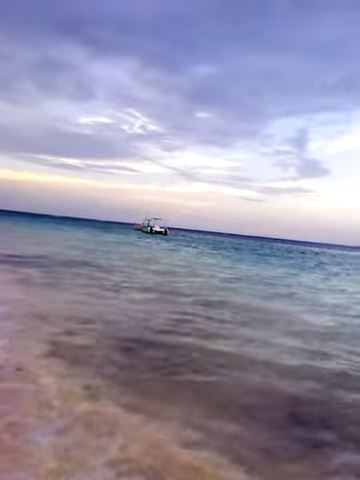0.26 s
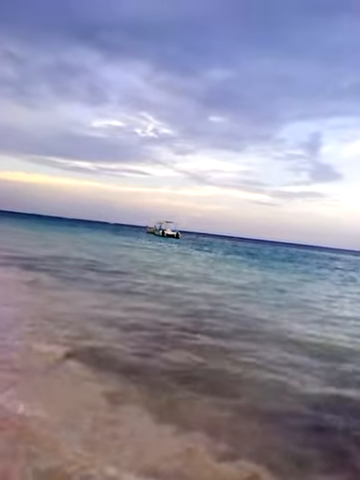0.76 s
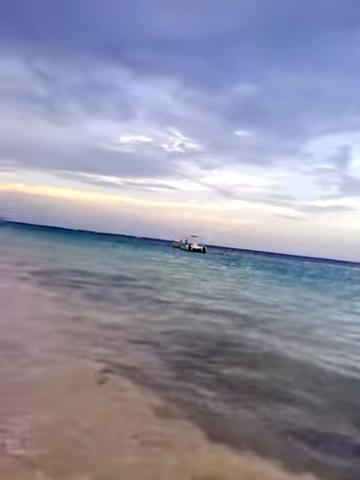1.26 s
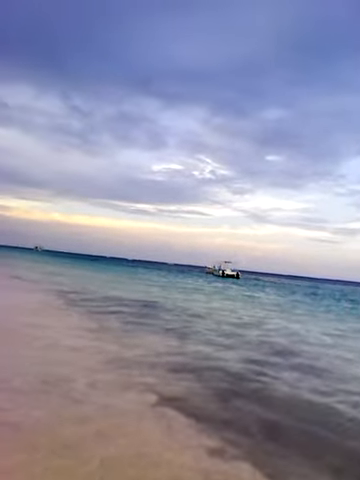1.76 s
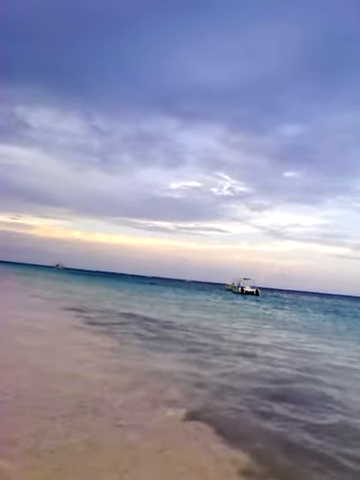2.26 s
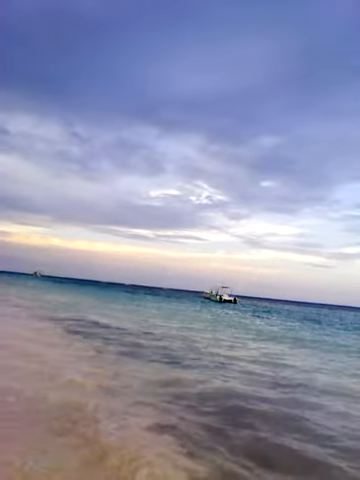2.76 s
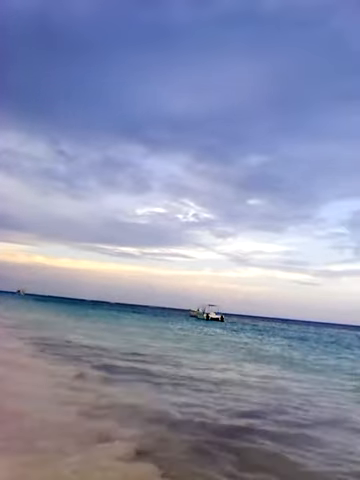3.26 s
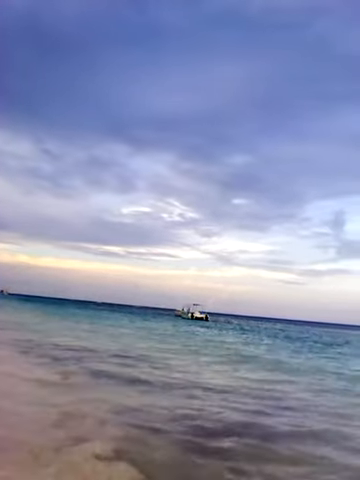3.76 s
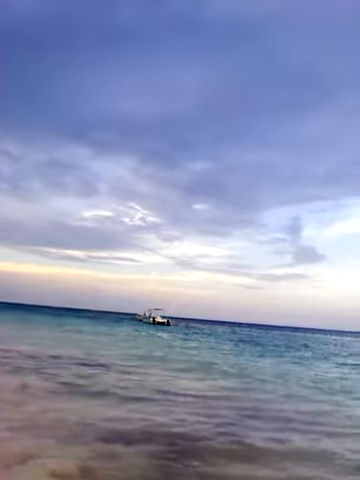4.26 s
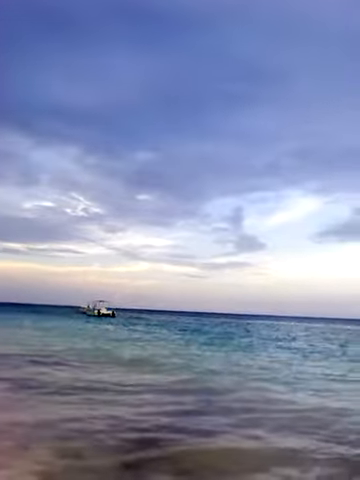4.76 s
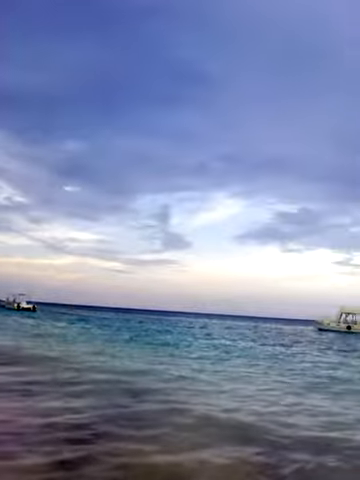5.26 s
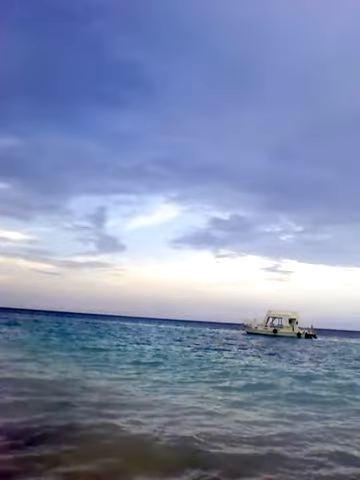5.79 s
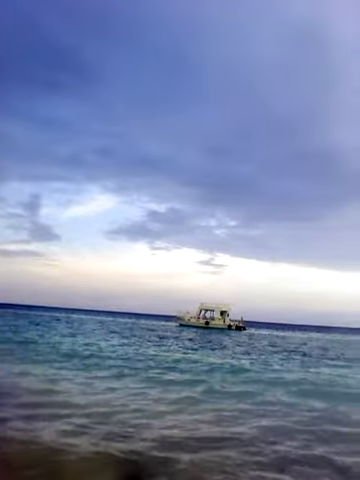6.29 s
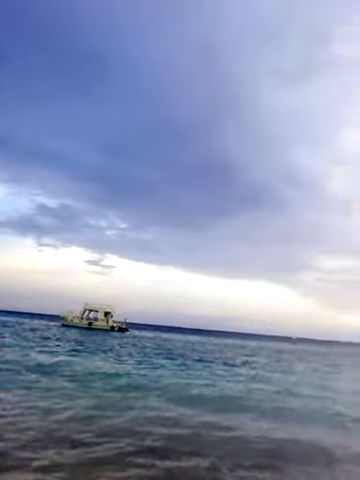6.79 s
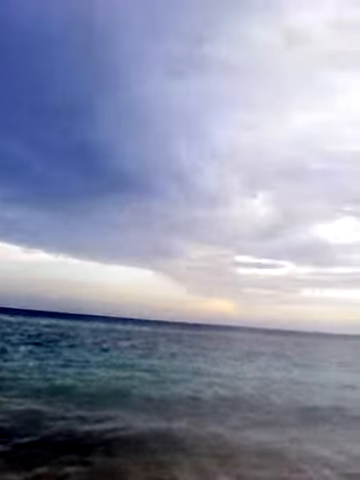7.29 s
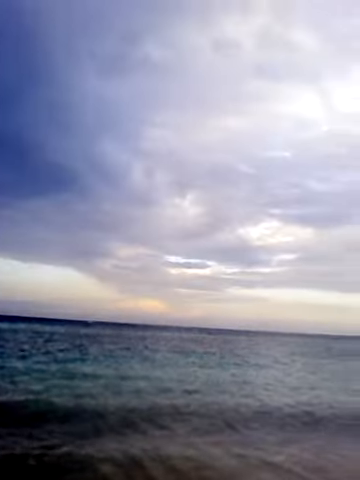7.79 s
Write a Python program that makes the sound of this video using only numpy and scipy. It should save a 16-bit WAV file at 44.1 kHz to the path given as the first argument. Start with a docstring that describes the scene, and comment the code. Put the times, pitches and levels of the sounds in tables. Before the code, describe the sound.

Outdoors on a sandy beach, heard through a small mono microphone that sharpens the water's hiss. From 0 s a steady light wash of tumbling bubbles and spray runs under wind; low bumps culminate in a hard burst at about 0.5 s, then scattered softer thuds until 2 s. The surf grows, fizzing, with small splashes after 2 s, and a small wave breaks near 2.9 s, its bubbling rush rising in pitch, then fading quickly while the wind is almost still. From 3.5 s buffeting returns, swelling at 4.4-5.4 s into heavy low rumble with sharp overloaded thumps near 5.2 s, while the water drops to a lull. A faint wavering low hum lingers from 5.4 to 7 s. At about 6 s the next wash hisses in, with little plops near 6.7 s, continuing to 8 s with occasional wind thuds.

```python
"""Small waves and wind on a beach

Surf: ringing bubbles tumble, spray and fizz; one wave breaks near 3 s, then a lull and the next wash.
Splashes: short swells of band-passed noise.
Wind: noise bands gusting on a small mono microphone, with a pressure pulse at each strong eddy.
Hum: an unsteady low note of air crossing an edge.
Microphone: its port rings near 6 kHz and sharpens the surf's hiss; the hardest puffs overload it."""
import sys
import numpy as np
from scipy import signal
from scipy.io import wavfile
from scipy.ndimage import uniform_filter1d

SR = 44100
rng = np.random.default_rng(int(sys.argv[2]) if len(sys.argv) > 2 else 0)


def pcm_store(signal):
    """Save signal as 16-bit PCM."""
    levels = np.round(np.clip(np.atleast_2d(signal), -1, 1) * 32767)
    wavfile.write(sys.argv[1], SR, levels.astype(np.int16).T)


N = 354563
TIME = np.arange(N) / SR   # s

# Levels are those ahead of the microphone's port; spectra are relative.
# hum of air across an edge: t/s, f/Hz, level/dB
HUM_CURVE = [(5.42, 130, -34.5), (5.62, 125.8, -32.5), (5.77, 124, -24.5), (5.93, 124, -24),
             (6.02, 129.2, -30), (6.3, 131.2, -29.5), (6.55, 130.7, -27), (6.7, 113.4, -28),
             (6.95, 107, -33)]
# steady breeze: t/s, level/dB
BREEZE_CURVE = [(0, -30), (.35, -42.5), (.85, -43), (1.2, -35.5), (1.75, -31.5), (2.15, -46), (3.25, -59),
                (3.55, -36.5), (4.35, -28), (5.55, -33), (6.95, -33.5), (7.25, -31.5), (8.04, -33)]
# gusts on top of the breeze: start/s, length/s, level/dB
GUST_EVENTS = [(0.468, 0.13, -25), (4.466, 0.67, -21.5), (5.147, 0.13, -20)]
# strongest eddies at the microphone: t/s, peak level/dB, length/s, core thump f/Hz
PUFF_EVENTS = [(.124, -22, 0.022, 303), (0.296, -22.5, 0.02, 300), (.434, -18, 0.0081, 148),
               (.536, -10, 0.025, 198), (.552, -9, 0.0079, 320), (0.564, -6.5, 0.0097, 516),
               (.653, -18.5, 0.024, 162), (.702, -14, 0.016, 390), (0.817, -24, .012, 198),
               (0.915, -19.5, 0.024, 380), (.972, -13.5, 0.023, 520), (1.048, -20.5, 0.01, 200),
               (1.21, -20.5, 0.039, 306), (1.4245, -19, 0.011, 298), (1.643, -19, .016, 280),
               (1.807, -21.5, 0.0083, 248), (1.95, -25, 0.015, 300), (3.355, -20, 0.0067, 227),
               (3.517, -25, 0.014, 248), (3.637, -23, 0.0066, 200), (3.713, -17.5, 0.023, 460),
               (4.025, -21, 0.024, 306), (4.175, -21, 0.018, 218), (4.377, -17.5, .015, 220),
               (4.485, -17, .04, 200), (4.544, -15, 0.0069, 302), (4.653, -12, .0073, 330),
               (4.772, -12, 0.022, 260), (4.8244, -13.5, 0.011, 550), (4.935, -15.5, .014, 170),
               (5.022, -15, .007, 180), (5.164, -11.5, 0.032, 402), (5.196, -4.5, 0.0061, 300),
               (5.1975, -8.5, .0008, 920), (5.2374, -7.5, 0.00075, 710), (5.2517, -7.5, 0.0059, 282),
               (5.292, -11, .016, 300), (5.384, -15, 0.0045, 314), (5.669, -22.5, 0.012, 320),
               (5.93, -23.5, 0.022, 172), (6.111, -25, 0.022, 283), (7.224, -16.5, 0.012, 322),
               (7.345, -19.5, 0.011, 277), (7.386, -22, 0.0099, 300), (7.64, -20.5, 0.054, 300),
               (8.01, -19, 0.033, 280)]
# wind pressure spectrum at the port: f/Hz, level/dB per Hz
BUFFET_SPECTRUM = [(20, -18), (45, -13.5), (80, -2.5), (135, 0), (190, 1), (260, -3), (380, -9.5),
                   (550, -21), (850, -40.5), (1400, -68), (2200, -80)]
# single splashes close by: t/s, level/dB, f/Hz, length/s
SPLASH_EVENTS = [(1.587, -43, 11000, .03), (2.182, -32, 6100, 0.24), (2.38, -30, 6200, 0.13),
                 (2.917, -25, 1510, .04), (3.365, -36, 10900, 0.023), (3.764, -31, 860, 0.035),
                 (6.034, -39, 5240, 0.025), (6.331, -38, 9000, 0.017), (6.651, -21, 1039, 0.0071),
                 (6.685, -28.5, 1040, 0.015), (6.744, -34, 796, 0.076)]
# surf spectra, tumbling water, spray and foam: f/Hz, level/dB per Hz
TUMBLE_SPECTRUM = [(50, -9), (130, -0.5), (320, 1.5), (480, 0.5), (750, -0.5), (1400, -3.5), (2200, -8.5),
                   (3500, -11.5), (7000, -17.5)]
SPRAY_SPECTRUM = [(1500, -8.5), (2800, -3), (4200, -1), (6000, 0.5), (8000, -7), (11000, -18), (15500, -23)]
FOAM_SPECTRUM = [(3000, 4.5), (5000, -3.5), (8000, 7.5), (11000, 0.5), (15500, 1)]
# strength of the wash: t/s, level/dB above the usual
WASH_CURVE = [(0, 0), (.8, 0.7), (1.1, 2.5), (1.8, 7), (2.1, 5), (2.88, 13), (3.2, 4.5), (3.7, -.7),
              (4.2, -2.5), (4.8, -13.5), (5.9, -15), (6.04, -5.5), (6.42, 2), (7.7, 4), (8.04, 6)]
# foam bursting on the sand: t/s, level/dB
FOAM_CURVE = [(0, -43.5), (1.2, -44), (1.6, -39.5), (2.8, -35.5), (3.3, -46), (6.0, -51), (6.8, -41),
              (8.04, -42.5)]

GUST_RISE_S, GUST_FALL_S = 0.04, 0.14   # time constants
# stray eddies: rate, mean level over the wind, uniform scatter (+/-), mean length
EDDIES_PER_S, EDDY_OVER_WIND_DB, EDDY_SCATTER_DB, EDDY_S = 6, 5.5, 1.5, 0.014
TUMBLE_DB, SPRAY_DB = -33.5, -38.5   # at the usual wash
TUMBLE_FOLLOWS = 0.79   # share of the wash's dB swing
BREAK_START_S, BREAK_PEAK_S, BREAK_DB = 2.19, 2.89, -26
BREAK_FADE_IN_S = 0.23   # ends at BREAK_START_S
BREAK_SWELL_DB_PER_S, BREAK_DECAY_DB_PER_S = 11.5, 17
CLOUD_START_HZ, CLOUD_END_HZ, CLOUD_RISE_S = 740, 1620, 0.68
PORT_HZ, PORT_Q, PORT_ADDED_DB = 6174, 5.54, 7   # resonance added to the direct sound
OVERLOAD, CUTOFF_HZ = 0.7, 15700   # OVERLOAD: amplitude limit


def from_db(db):
    """Decibels to gain."""
    return 10 ** (np.asarray(db) / 20)


def rms_one(x):
    """Scale to rms 1."""
    return x / np.sqrt(np.mean(x ** 2) + 1e-20)


def in_time(rows):
    """Interpolate each column of a curve to every sample."""
    times_s, *columns = np.transpose(rows)
    return [np.interp(TIME, times_s, column) for column in columns]


def at_hz(spectrum, hz):
    """Read a spectrum's dB on a log-frequency axis."""
    freqs_hz, levels_db = np.transpose(spectrum)
    return np.interp(np.log(hz), np.log(freqs_hz), levels_db)


def drift(rate_hz):
    """Slow random signal, rms 1: noise through two equal one-pole low-passes, run at SR / 40."""
    pole = np.exp(-2 * np.pi * rate_hz * 40 / SR)
    noise = rng.standard_normal(N // 40 + 2002)
    slow = signal.lfilter([1], [1, -2 * pole, pole * pole], noise)[2000:]   # skip the settling
    return np.interp(np.arange(N) / 40, np.arange(len(slow)), rms_one(slow))


def band(x, low_hz, high_hz):
    """Causal Butterworth band-pass."""
    edges_hz = [low_hz, min(high_hz, .45 * SR)]
    sos = signal.butter(2, edges_hz, "band", fs=SR, output="sos")
    return signal.sosfilt(sos, x + 1e-18)


def bands(low_hz, high_hz, count):
    """(low edge, centre, high edge) in Hz of bands evenly spread in pitch."""
    edges = np.geomspace(low_hz, high_hz, count + 1)
    return zip(edges, np.sqrt(edges[:-1] * edges[1:]), edges[1:])


def swell(at_s, length_s):
    """Bell-shaped rise and fall of height 1 around a moment."""
    out = np.zeros(N)
    near = slice(max(int((at_s - 2 * length_s) * SR), 0), int((at_s + 2 * length_s) * SR))
    out[near] = np.exp(-2 * ((TIME[near] - at_s) / length_s) ** 2)
    return out


def evened(x, window_s):
    """Hold a noise near rms 1 over a sliding window."""
    size = max(int(window_s * SR), 2)
    power = uniform_filter1d(uniform_filter1d(x * x, size), size)
    return x / np.sqrt(np.abs(power) + 1e-12)


def while_listed(rows, fade_s=0.26):
    """1 over the time that a curve covers, fading to 0 outside it."""
    inside_s = np.minimum(TIME - rows[0][0], rows[-1][0] - TIME)
    return np.clip(1 + inside_s / fade_s, 0, 1)


def edge_hum(waver_hz=10, steady=0.93, flutter_db=4.5):
    """Air shedding eddies off an edge gives an unsteady low note."""
    hz, db = in_time(HUM_CURVE)
    phase = 2 * np.pi * np.cumsum(hz) / SR
    note = (steady + drift(waver_hz)) * np.cos(phase) + drift(waver_hz) * np.sin(phase)
    return from_db(db + flutter_db * drift(7.3)) * evened(note, 0.1) * while_listed(HUM_CURVE)


def airflow():
    """Wind strength: each gust rises quickly out of the breeze, holds and falls back."""
    flow = from_db(in_time(BREEZE_CURVE)[0])
    for start_s, length_s, db in GUST_EVENTS:
        before = np.maximum(start_s - TIME, 0) / GUST_RISE_S
        after = np.maximum(TIME - start_s - length_s, 0) / GUST_FALL_S
        flow = np.maximum(flow, from_db(db) * np.exp(-before - after))
    return flow


def stray_eddies(flow):
    """Weaker eddies at random moments, scaled to the wind that carries them: (s, peak dB, length s)."""
    count = int(np.clip(EDDIES_PER_S * N / SR, 1, 200))
    eddies = []
    for when, strength, size in rng.random((200, 3))[:count]:
        wind_db = 20 * np.log10(flow[int(when * N)])
        peak_db = wind_db + EDDY_OVER_WIND_DB + EDDY_SCATTER_DB * (2 * strength - 1)
        eddies.append((when * N / SR, peak_db, EDDY_S * (.5 + size)))
    return eddies


def eddy_core(at_s, hz):
    """An eddy's core sucks at the diaphragm, which rebounds on either side; depth 1."""
    out = np.zeros(N)
    near = slice(max(int(at_s * SR) - SR // 50, 0), int(at_s * SR) + SR // 50)
    spread = (np.pi * hz * (TIME[near] - at_s)) ** 2
    out[near] = (2 * spread - 1) * np.exp(-spread)
    return out


def wind(flutter_db=4.0, flapping_db=2.0, flutter_top_db=6.5, brightening=0.53,
         smooth_flow=0.55, dull_hz=1400, core_over_puff_db=5.0):
    """Turbulent pressure on the port: the harder an eddy hits, the higher its rumble reaches."""
    flow = airflow()
    unsteady_db = flutter_db * drift(15.8) + flapping_db * drift(42)
    breeze = flow * from_db(np.minimum(unsteady_db, flutter_top_db))
    puffs, cores, strays = np.zeros((3, N))
    for at_s, db, length_s, core_hz in PUFF_EVENTS:
        puffs += from_db(db) * swell(at_s, length_s)
        cores += from_db(db + core_over_puff_db) * eddy_core(at_s, core_hz)
    for at_s, db, length_s in stray_eddies(flow):
        strays = np.maximum(strays, from_db(db) * swell(at_s, length_s))
    force = np.max([breeze, strays, puffs], axis=0)   # a strong eddy sweeps small ones aside
    hardness = force / np.sqrt(uniform_filter1d(force ** 2, SR // 2))   # against its 0.5 s rms
    # big slow eddies are weak while the air hums smoothly across the edge
    slow_eddies = 1 - smooth_flow * while_listed(HUM_CURVE)
    white, rumble = rng.standard_normal((2, N)), 0
    for k, (low, hz, high) in enumerate(bands(21.9, 2320, count=14)):
        octaves_up = max(np.log2(hz / 160), 0)
        gain = from_db(at_hz(BUFFET_SPECTRUM, hz)) * hardness ** (brightening * octaves_up)
        if hz < 90:
            gain = gain * slow_eddies
        rumble = rumble + band(white[k % 2], low, high) * gain
    pressure = force * evened(rumble, 0.029)
    return cores + signal.sosfilt(signal.butter(4, dull_hz, fs=SR, output="sos"), pressure)


def splashes():
    """Short sprays and low plops of water falling back: swells of band-passed noise."""
    out = np.zeros(N)
    for at_s, db, hz, length_s in SPLASH_EVENTS:
        water = rms_one(band(rng.standard_normal(N), hz / 1.6, hz * 1.08))
        out += from_db(db) * swell(at_s, length_s) * water
    return out


def bubbles(spectrum, low_hz, high_hz, per_s, size_db, blur, patchy_db, surge_db, count):
    """Uneven bubbles ring for a few cycles over the blur of countless far ones; rms 1."""
    out, surge = 0, surge_db * drift(10.0)
    far = rng.standard_normal((2, N))
    chance = rng.random((2, N))
    sizes = from_db(size_db * np.minimum(rng.exponential(1, N), 4)) * rng.choice([-1, 1], N)
    for k, (low, hz, high) in enumerate(bands(low_hz, high_hz, count)):
        born = np.roll(chance[k % 2], k * SR // 7) < per_s / count / SR   # per_s spans all bands
        water = rms_one(sizes * born) + blur * far[k % 2]
        level_db = at_hz(spectrum, hz) + patchy_db * drift(16.3)
        out = out + band(water, low, high) * from_db(level_db)
    return rms_one(out * from_db(surge))


def breaker(width_octaves=0.85):
    """The crest traps a bubble cloud ringing around one pitch, which rises as the bubbles split up."""
    age_s, past_peak_s = TIME - BREAK_START_S, TIME - BREAK_PEAK_S
    db = BREAK_DB + np.minimum(BREAK_SWELL_DB_PER_S * past_peak_s, -BREAK_DECAY_DB_PER_S * past_peak_s)
    rise = np.clip(age_s / CLOUD_RISE_S, 0, 1)
    pitch_hz = CLOUD_START_HZ * (CLOUD_END_HZ / CLOUD_START_HZ) ** rise
    cloud = 0
    for low, hz, high in bands(355, 4170, count=8):
        born = rng.random(N) < 900 / SR   # 900 per s in each band
        rings = rms_one(band(rng.standard_normal(N) * born, low, high))
        cloud = cloud + rings * np.exp(-.5 * (np.log2(hz / pitch_hz) / width_octaves) ** 2)
    return from_db(db) * rms_one(cloud) * np.clip(1 + age_s / BREAK_FADE_IN_S, 0, 1)


def surf():
    """Big bubbles gurgle in tumbling water, spray patters down, the finest foam bursts on the sand."""
    wash_db, = in_time(WASH_CURVE)
    foam_db, = in_time(FOAM_CURVE)
    spatter_db = .5 * drift(37)   # handfuls of drops land together
    tumble = bubbles(TUMBLE_SPECTRUM, 47.4, 6880, per_s=4000, size_db=2.5, blur=1.0,
                     patchy_db=1.4, surge_db=0.51, count=20)
    spray = bubbles(SPRAY_SPECTRUM, 1460, 15900, per_s=12000, size_db=6.0, blur=1.55,
                    patchy_db=0.87, surge_db=0.1, count=10)
    foam = bubbles(FOAM_SPECTRUM, 3330, 15660, per_s=2400, size_db=2.5, blur=1.54,
                   patchy_db=0.9, surge_db=0.8, count=6)
    tumble = tumble * from_db(TUMBLE_DB + TUMBLE_FOLLOWS * wash_db)
    spray = spray * from_db(SPRAY_DB + wash_db + spatter_db)
    foam = foam * from_db(foam_db + 2 * spatter_db)
    return tumble + spray + foam


def scene():
    """Sea and wind meet at one microphone, which feeds both channels."""
    mono = edge_hum() + wind() + splashes() + breaker() + surf()
    return np.array([mono, mono])


def record(dry):
    """The port rings, peaks flatten against the overload limit, the top is cut."""
    ringing = signal.lfilter(*signal.iirpeak(PORT_HZ, PORT_Q, fs=SR), dry)
    ported = dry + from_db(PORT_ADDED_DB) * ringing
    clipped = ported / (1 + (ported / OVERLOAD) ** 12) ** (1 / 12)
    return signal.sosfilt(signal.ellip(16, .1, 90, CUTOFF_HZ, fs=SR, output="sos"), clipped)


dry = scene()
out = record(dry)
pcm_store(out)
```